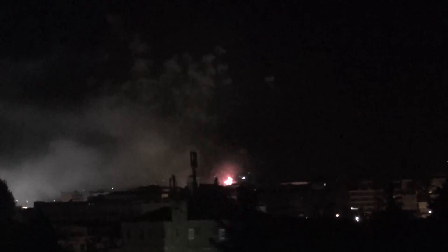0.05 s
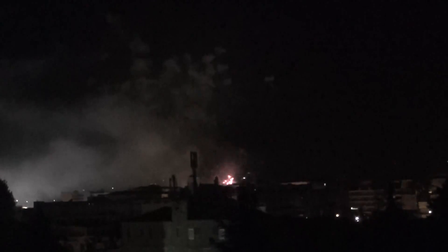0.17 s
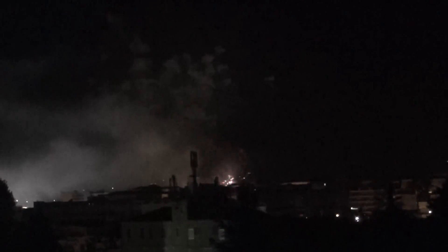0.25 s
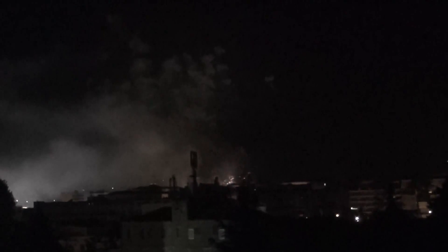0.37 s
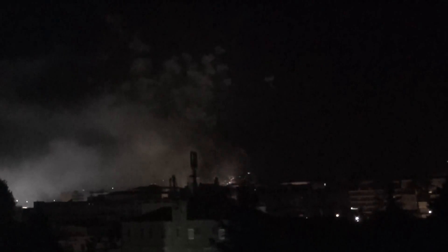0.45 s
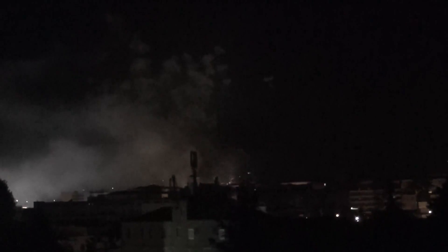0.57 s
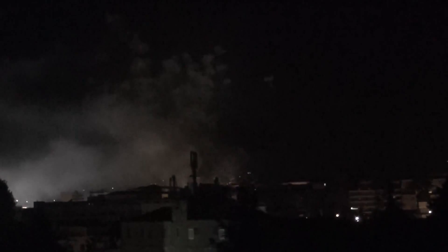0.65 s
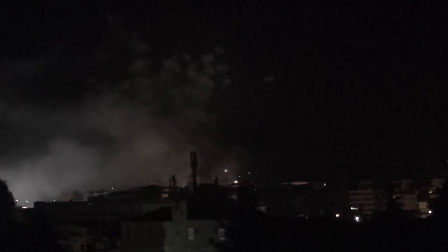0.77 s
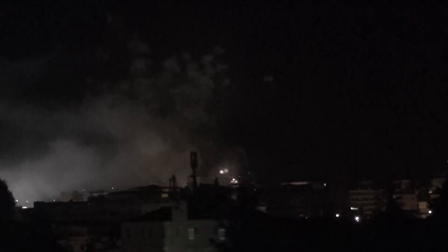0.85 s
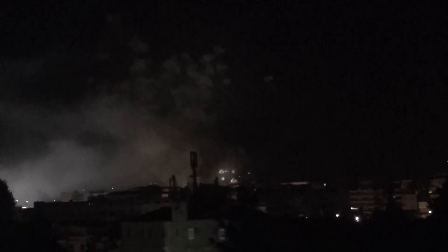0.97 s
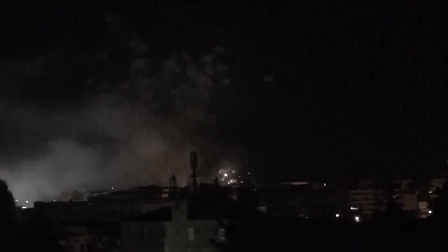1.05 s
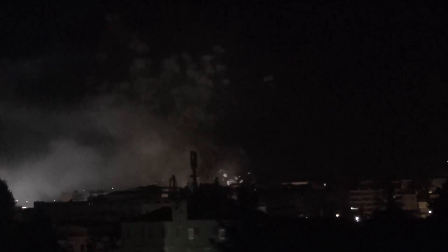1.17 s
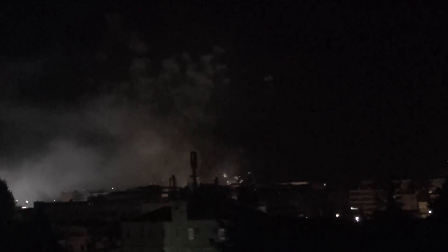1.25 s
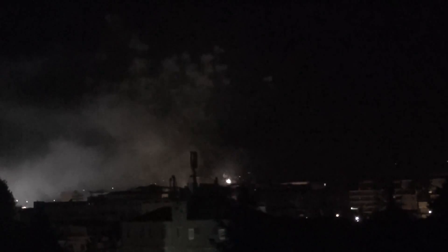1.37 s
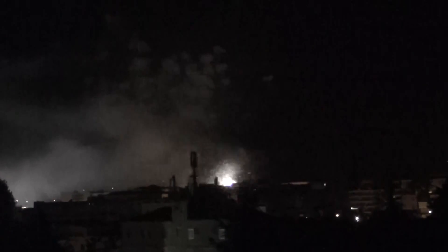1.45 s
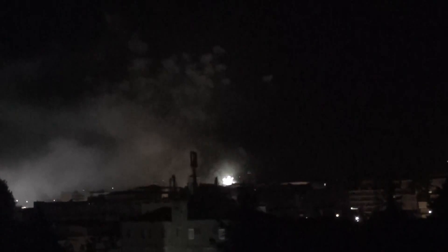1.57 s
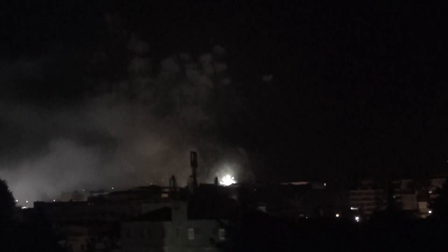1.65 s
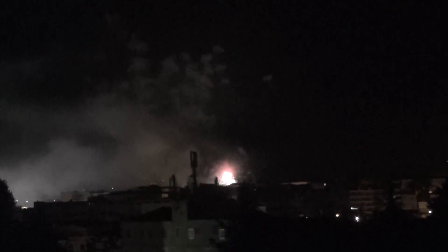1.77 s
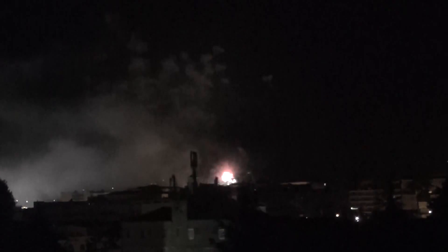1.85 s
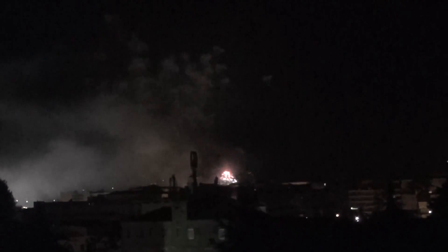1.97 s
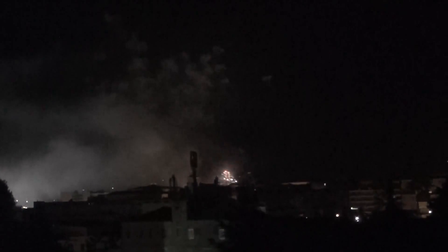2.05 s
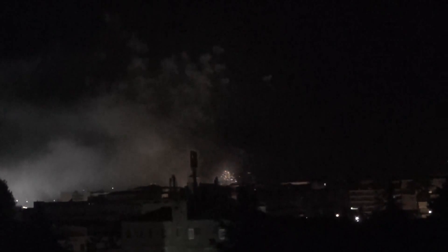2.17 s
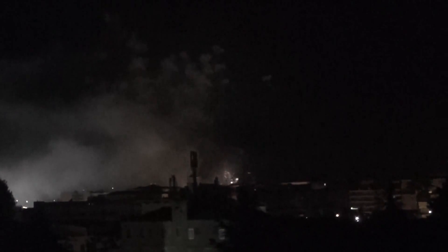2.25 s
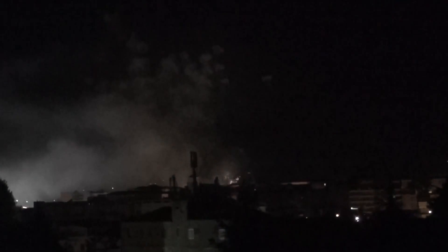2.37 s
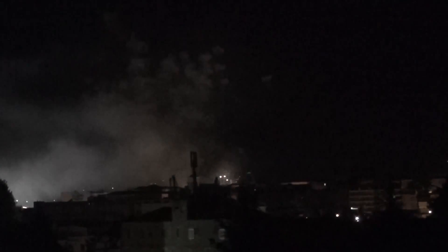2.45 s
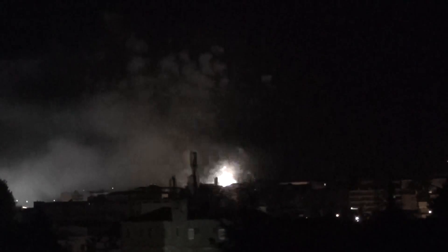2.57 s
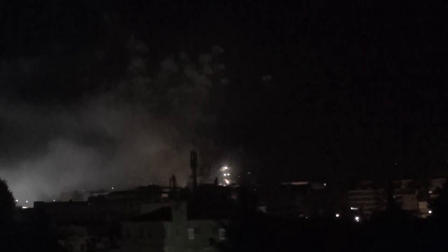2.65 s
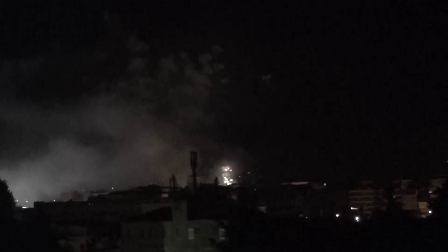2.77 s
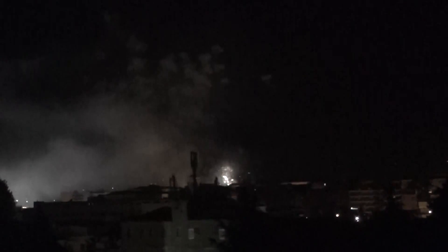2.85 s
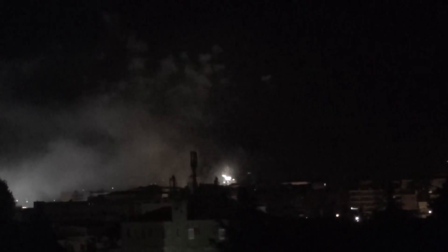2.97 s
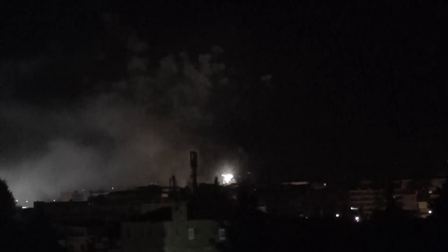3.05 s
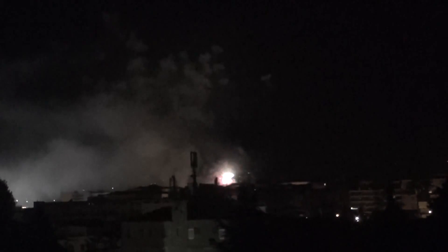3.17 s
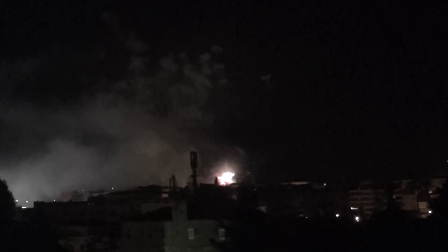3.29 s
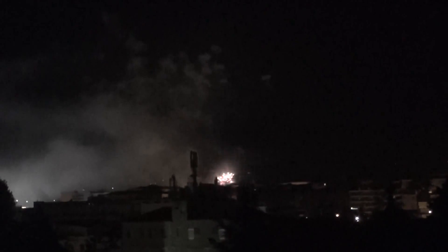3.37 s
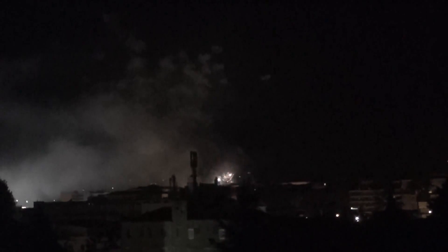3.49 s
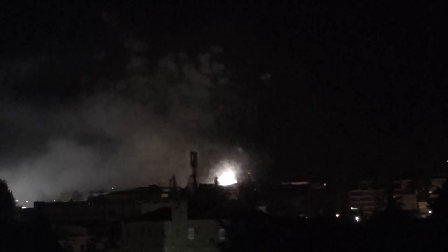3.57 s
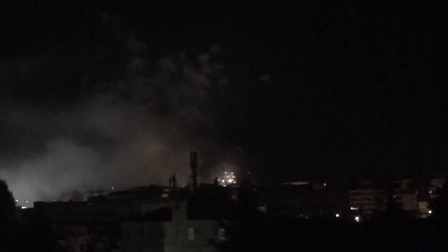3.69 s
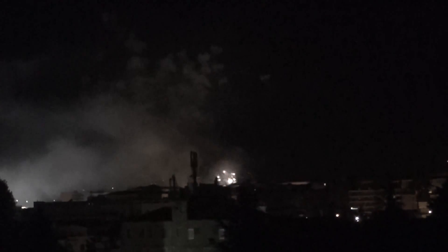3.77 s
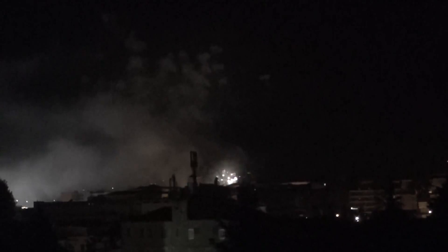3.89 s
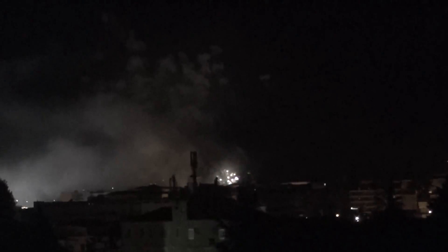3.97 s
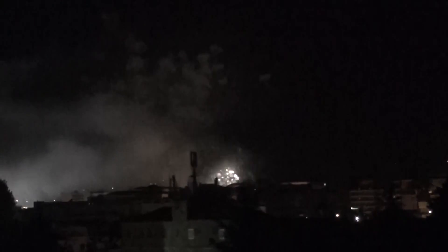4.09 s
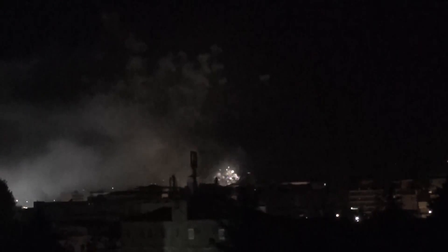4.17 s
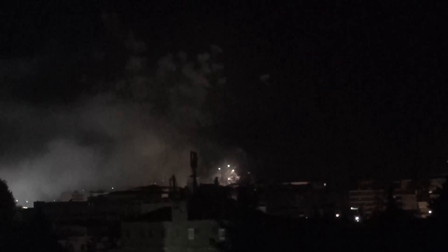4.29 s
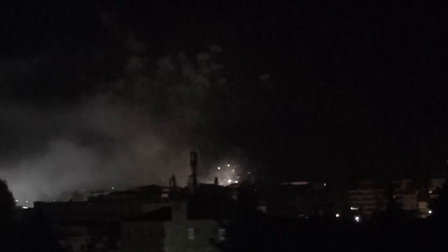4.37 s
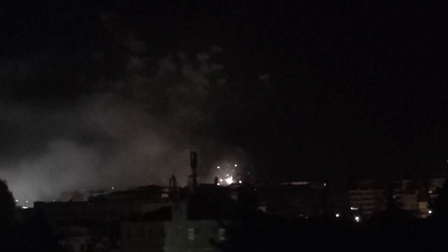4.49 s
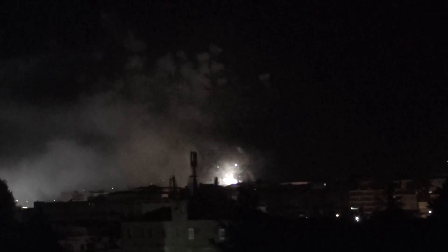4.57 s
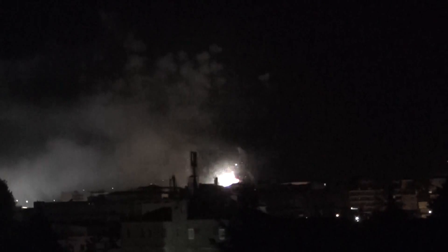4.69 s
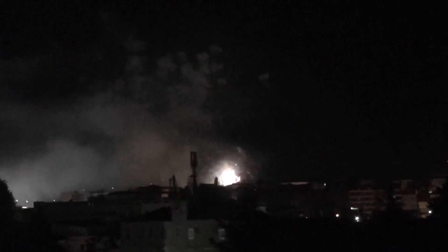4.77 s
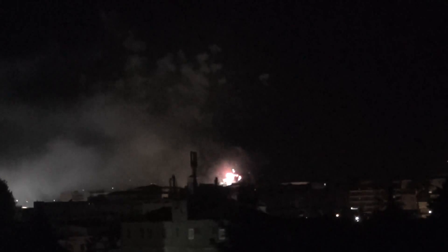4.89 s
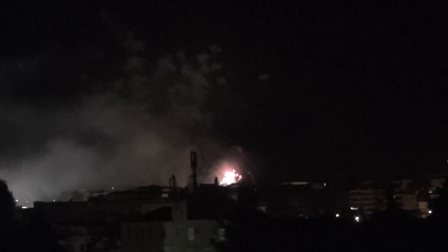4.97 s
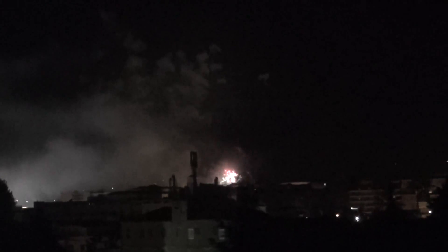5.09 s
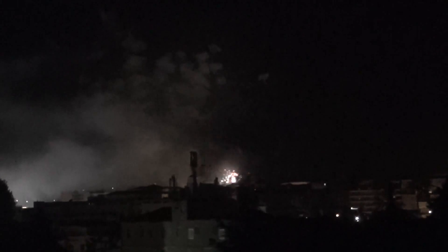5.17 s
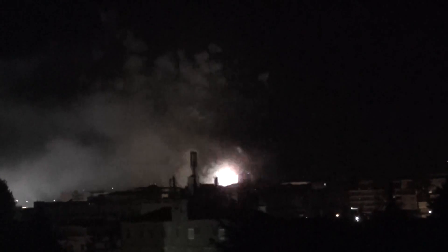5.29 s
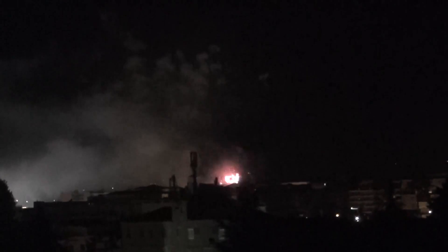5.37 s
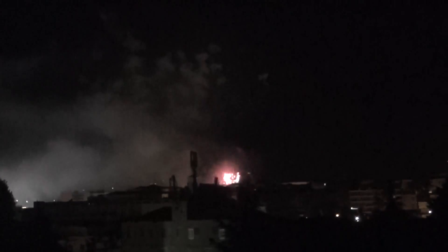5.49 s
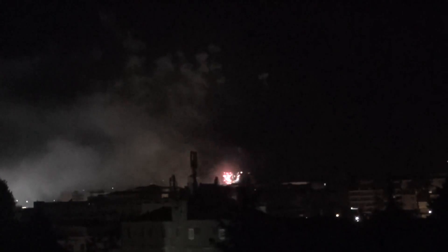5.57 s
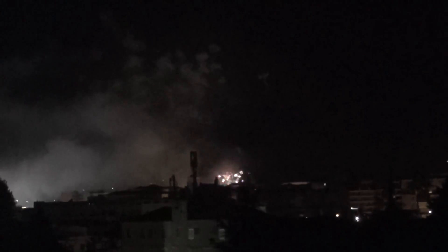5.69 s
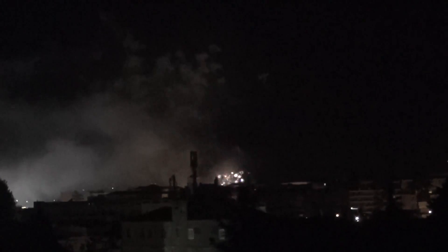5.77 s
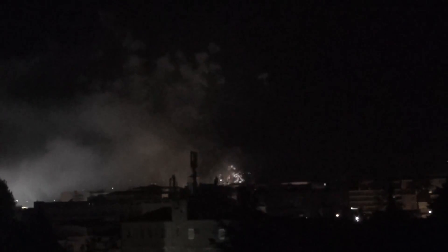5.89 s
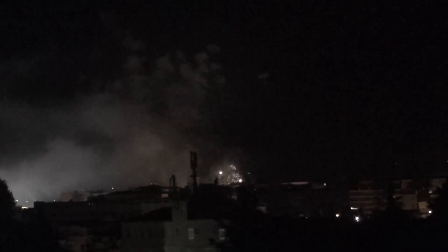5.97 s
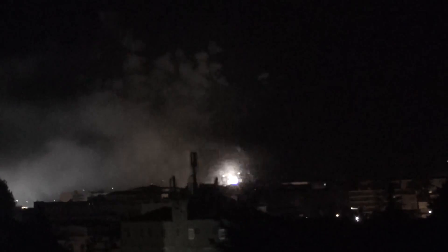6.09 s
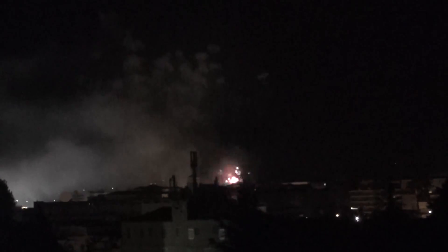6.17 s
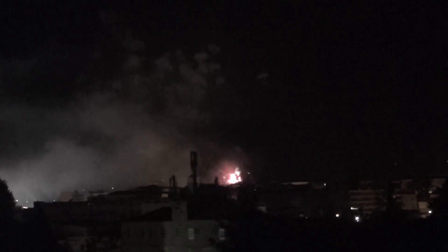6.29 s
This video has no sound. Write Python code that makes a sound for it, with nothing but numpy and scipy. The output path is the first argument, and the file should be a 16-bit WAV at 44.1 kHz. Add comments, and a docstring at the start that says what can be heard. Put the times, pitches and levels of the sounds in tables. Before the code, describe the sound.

Fireworks go off on the far side of a town at night. Each shot arrives as a dull crack and rolls away in echoes from houses and hills. After a short opening lull, the bangs come in uneven clusters, thickest in the second half, where a few small, brighter snaps join them. Far traffic murmurs underneath, with a faint engine drone and the thin hiss and whine of a phone microphone.

```python
"""A town at night, with fireworks going off at one spot on its far side, heard through a phone's stereo mic.
Each shot arrives as a dull crack, then rolls back from houses and hills, always along the same paths.
Under it lie the murmur of far traffic, the drone of one engine and the phone's own hiss and whine.
Between the shots, small stars snap in the air."""
import sys
import numpy as np
from scipy import signal
from scipy.fft import rfft, irfft
from scipy.io import wavfile
from scipy.ndimage import uniform_filter1d

SR = 44100
rng = np.random.default_rng(int(sys.argv[2]) if len(sys.argv) > 2 else 0)


def master(y):
    """Save y as 16-bit WAV."""
    cut = np.clip(np.atleast_2d(y).T, -1, 1)
    pcm = np.round(cut * 32767)  # scale
    wavfile.write(sys.argv[1], SR, pcm.astype(np.int16))


N = 279594
LEAD_S = 1  # room for a shot just before the start


def undb(db):
    """Decibels to gain."""
    return 10 ** (np.asarray(db) / 20)


def level(x, db):
    """Set the rms level."""
    return x * undb(db) / np.sqrt(np.mean(x ** 2))


def gains(spectrum, hz):
    """Gain at each frequency, from rows of freq_hz, level_db."""
    knots_hz, db = np.transpose(spectrum)
    return undb(np.interp(np.log(hz + 1), np.log(knots_hz), db))


def pulse(spectrum, size=2048):
    """The most compact causal pressure pulse that has this spectrum."""
    hz = np.linspace(0, SR / 2, size // 2 + 1)
    cepstrum = irfft(np.log(gains(spectrum, hz)))
    cepstrum[1:size // 2] *= 2
    cepstrum[size // 2 + 1:] = 0
    return irfft(np.exp(rfft(cepstrum)))


def wander(rate_hz):
    """A smooth random drift with rms 1."""
    hold = int(SR / rate_hz)
    steps = np.repeat(rng.standard_normal(N // hold + 1), hold)
    return level(uniform_filter1d(uniform_filter1d(steps, hold), hold)[:N], 0)


def add(out, x, start_s):
    """Mix x into out from start_s on."""
    room = out[..., int(round(start_s * SR)):][..., :x.shape[-1]]
    room += x[..., :room.shape[-1]]


# Stereo width at the mic, greatest in the middle treble: freq_hz, side_minus_mid_db
MIC_WIDTH = [(40, -25), (130, -32.5), (300, -31.5), (550, -23), (1000, -12), (2000, -7), (5000, -10.5),
             (9000, -16), (12000, -32)]

def diffuse(spectrum, size, wide_db=0, wide_hz=600):
    """Sound from many directions at two close mic ports, rms 1; wide_db widens the lows."""
    hz = np.linspace(0, SR / 2, size // 2 + 1)
    mid, side = rfft(rng.standard_normal((2, size))) * gains(spectrum, hz)
    side = side * gains(MIC_WIDTH, hz) * undb(wide_db / (1 + (hz / wide_hz) ** 4))
    return level(irfft(np.array([mid + side, mid - side]), size), 0)


# Slaps off the walls right beside the mic: delay_ms, gain_db
WALL_SLAPS = [(2.4, -9), (4.4, -6.5), (6.5, -22), (11, -18)]

def direct_wave(spectrum, db, pan_db, lag_hz=550, smear_hz=1700, q=1.08, wall_hz=800):
    """The straight wave, smeared by its long way over the ground, and its slaps from the nearest walls."""
    wave = level(pulse(spectrum), db)
    for hz in (lag_hz, smear_hz):
        # an all-pass: the body of the blast trails its front by a millisecond or two
        wave = wave - 2 * signal.lfilter(*signal.iirpeak(hz, q, fs=SR), wave)
    # small surfaces throw back only the short waves
    slap = signal.sosfilt(signal.butter(2, wall_hz, "high", fs=SR, output="sos"), wave)
    for delay_ms, gain_db in WALL_SLAPS:
        add(wave, slap * undb(gain_db), delay_ms / 1000)
    return wave * undb(np.array([[pan_db], [-pan_db]]) / 2)


# Groups of houses and slopes, each answering with a swell of its own: delay_s, spread_s, level_db
HOUSES_AND_SLOPES = [(.016, .022, -2), (.096, .012, -1.5), (0.148, 0.013, -1.5), (0.192, 0.016, -4),
                     (0.333, 0.021, -8.5)]

def echo_envelope(t, attack_s=0.0024, fall_db_per_s=19.5, far_db=-26, far_fall_db_per_s=6):
    """The town's answer t seconds after a report: scattered echoes, far tail and swells add in power."""
    scattered = undb(-2 - fall_db_per_s * t)
    far_tail = undb(far_db - far_fall_db_per_s * t)
    power = scattered ** 2 + far_tail ** 2
    for delay_s, spread_s, level_db in HOUSES_AND_SLOPES:
        power += undb(level_db) ** 2 * np.exp(-0.5 * ((t - delay_s) / spread_s) ** 2)
    return np.clip(t / attack_s, 0, 1) ** 2 * np.sqrt(power)


def rolling_echo(spectrum, db, dull_db_per_s, dull_hz=1150, even_s=0.022):
    """Countless echoes from the town; the later ones have crossed more air and lost treble."""
    t = np.arange(2 * SR) / SR
    echoes = diffuse(spectrum, len(t))
    running_power = uniform_filter1d(np.mean(echoes ** 2, axis=0), int(even_s * SR))
    echoes = echoes / np.sqrt(running_power)
    low = signal.sosfiltfilt(signal.butter(2, dull_hz, fs=SR, output="sos"), echoes)
    glint_db = 3.2 * wander(107)[:len(t)]  # single house fronts throw back brighter slaps
    treble = (echoes - low) * undb(glint_db - dull_db_per_s * t)
    return undb(db) * echo_envelope(t) * (low + treble)


def travel(source, paths):
    """Carry a source along unchanging paths to the mic and drop the lead-in."""
    return signal.fftconvolve(source[None], paths, axes=1)[:, LEAD_S * SR:LEAD_S * SR + N]


# Shots across town, crack and edge relative to the body: start_s, level_db, crack_db, edge_db
FAR_SHOTS = [(-.082, 0, -2, -4.5), (1.3417, .5, 0.5, 1.5), (1.490, 0, -3.5, -7), (1.6754, -0.5, 1, -10),
             (2.6037, 1.6, 0, -3), (2.914, 0.4, 0, 3.5), (3.074, 0.7, 0, -5.5), (3.63, 2, -1.5, -1.5),
             (4.387, 0.6, -0.5, -3), (4.5734, 0, -12, -12), (4.733, -0.5, -1, -6), (4.836, 0.1, -2.5, -4.5),
             (5.1699, 2.1, -4.5, -10), (5.3617, 3.5, -1.5, -3), (6.108, 1.4, -4.5, -14)]
# The dull crack that comes straight to the mic: freq_hz, level_db
CRACK_SPECTRUM = [(40, -28), (100, -21), (200, -2), (360, 0.5), (540, -6), (730, -10.5), (1000, -19.5),
                  (1230, -9), (1650, -9.5), (1950, -23.5), (2250, -16.5), (2900, -30), (4200, -36.5),
                  (6000, -89)]
# The roll that comes back from houses and hills: freq_hz, level_db
ECHO_SPECTRUM = [(30, -45), (70, -34), (120, -11), (165, -8), (186, -2), (210, -5.5), (300, 1), (450, 0),
                 (600, -3), (800, -11), (1050, -17.5), (1500, -19.5), (1900, -25), (2800, -33.5),
                 (4200, -44), (7000, -81)]

def shots(body_hz=550, crack_hz=1400, edge_hz=3000):
    """Distant blasts, some sharp and some soft, that all share one direct wave and one rolling echo."""
    source = np.zeros(N + LEAD_S * SR)
    for start_s, level_db, crack_db, edge_db in FAR_SHOTS:
        blast = undb(level_db) * pulse([(body_hz, 0), (crack_hz, crack_db), (edge_hz, edge_db)])
        add(source, blast, LEAD_S + start_s)
    paths = rolling_echo(ECHO_SPECTRUM, db=-33.5, dull_db_per_s=12.5)
    add(paths, direct_wave(CRACK_SPECTRUM, db=-39.5, pan_db=-1.5), 0)
    return travel(source, paths)


# Far traffic, all round the mic: freq_hz, level_db
TRAFFIC_SPECTRUM = [(20, -15), (45, -9.5), (60, -6.5), (130, -1), (300, 3.5), (600, -3), (1000, -6),
                    (2000, -17), (3500, -27.5), (7000, -37), (14000, -53)]

def traffic(level_db=-49):
    """The murmur of the town, swelling slowly; its lows are wide because it comes from every side."""
    murmur = diffuse(TRAFFIC_SPECTRUM, N, wide_db=11)
    swell_db = 2.18 * wander(1.5) + 0.5 * wander(7.82)
    return murmur * undb(level_db + swell_db)


def engine(pitch_hz=125.1, idle_db=-65, swell_db=9, swell_at_s=0.72, attack_s=0.18, fall_db_per_s=1.2):
    """A far engine drones on one wavering note, swells up once and slowly recedes."""
    age_s = np.arange(N) / SR - swell_at_s
    effort = np.clip(age_s / attack_s, 0, 1)
    db = idle_db + effort * (swell_db - fall_db_per_s * age_s)
    cycles = np.cumsum(pitch_hz * (1 + 0.00684 * wander(8))) / SR
    return np.sqrt(2) * np.sin(2 * np.pi * cycles) * undb(db + 1.2 * wander(6.2))


# The mic's own hiss: freq_hz, level_db
HISS_SPECTRUM = [(500, -4.5), (3500, 0.5), (5000, 1), (7000, -2), (9200, -2), (11000, -1), (14000, -3),
                 (16000, -7)]
# Steady tones from inside the phone, lower and upper: pitch_hz, rms_db
LOW_TONES = [(1997, -74), (2401, -81)]
HIGH_TONES = [(3402, -82.5), (3601, -93), (4000, -67), (5001, -109.5), (6002, -71.5), (8000, -76.5),
              (10002, -76), (11999, -93)]

def electronics(hiss_db=-70, skew_rad=0.22):
    """The phone's steady hiss and thin whine; the whine is slightly out of step in the two channels."""
    t = np.arange(N) / SR
    skew = np.array([[skew_rad], [-skew_rad]])
    whine = np.zeros((2, N))
    for pitch_hz, rms_db in [*LOW_TONES, *HIGH_TONES]:
        phase = 2 * np.pi * (pitch_hz * t + rng.random())
        whine += np.sqrt(2) * undb(rms_db) * np.sin(phase + skew)
    return whine + diffuse(HISS_SPECTRUM, N) * undb(hiss_db)


# Stars snapping in the air, far from the mic: start_s, level_db
STAR_SNAPS = [(1.817, -7), (4.712, 3), (4.872, 1.5), (4.979, -7), (5.309, 1.5), (5.499, -7), (6.246, 2)]
# One snap as it reaches the mic: freq_hz, level_db
SNAP_SPECTRUM = [(300, -21), (900, -4), (1600, 4.5), (2550, 2), (3500, -4.5), (4400, -20), (6000, -51)]

def star_snaps(rise_s=0.0023):
    """Small bright reports that swell and die within milliseconds, each with a faint echo."""
    source = np.zeros(N + LEAD_S * SR)
    for start_s, level_db in STAR_SNAPS:
        add(source, undb([level_db]), LEAD_S + start_s)
    paths = rolling_echo(SNAP_SPECTRUM, db=-60.5, dull_db_per_s=28)
    age = np.arange(SR // 10) / SR / rise_s
    envelope = undb(-46) * age * np.exp(1 - age)
    add(paths, diffuse(SNAP_SPECTRUM, len(age)) * envelope, 0)
    return travel(source, paths)


def scene():
    """Far fireworks over the sounds of the town, as they reach the mic."""
    return shots() + star_snaps() + traffic() + engine()


def record(dry):
    """The phone adds its own noise and cuts the top above 15.7 kHz."""
    top_cut = signal.ellip(10, 0.1, 60, 15700, fs=SR, output="sos")
    return signal.sosfiltfilt(top_cut, dry + electronics())


dry = scene()
out = record(dry)
master(out)
```